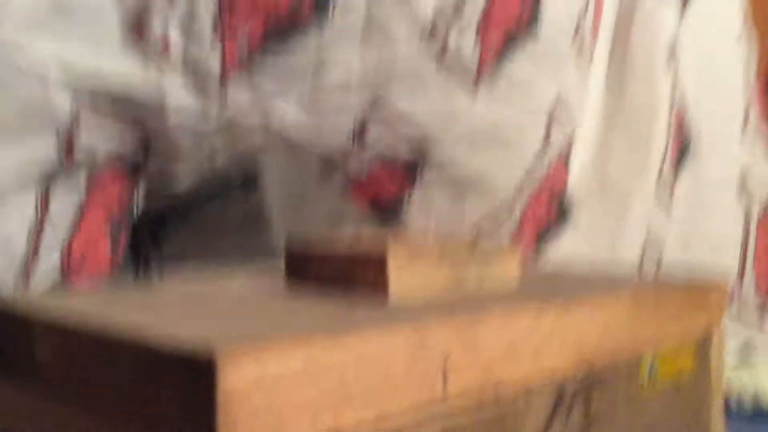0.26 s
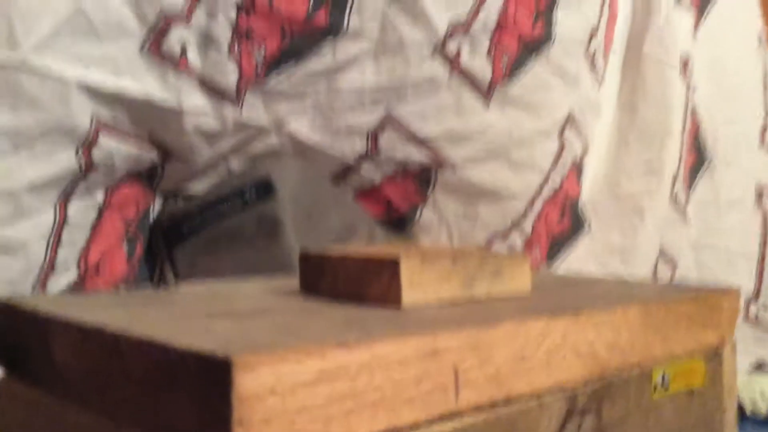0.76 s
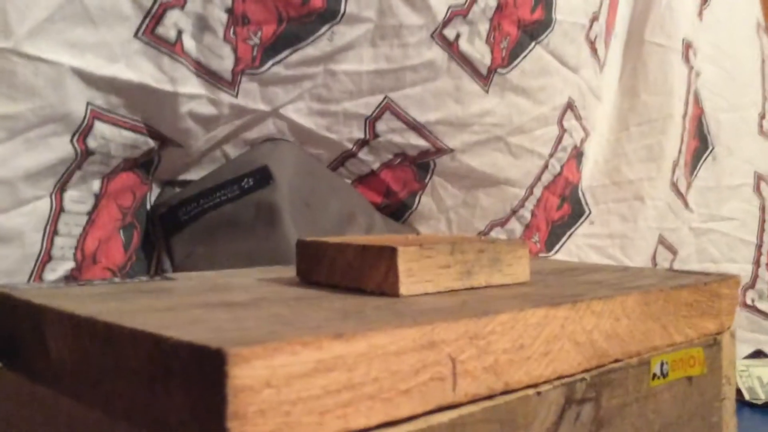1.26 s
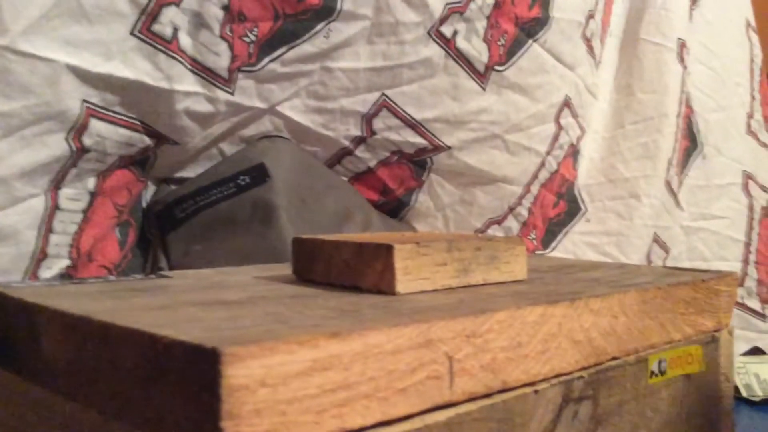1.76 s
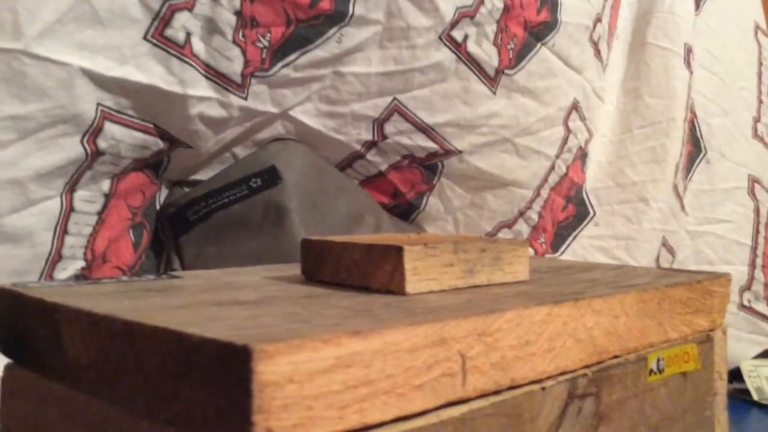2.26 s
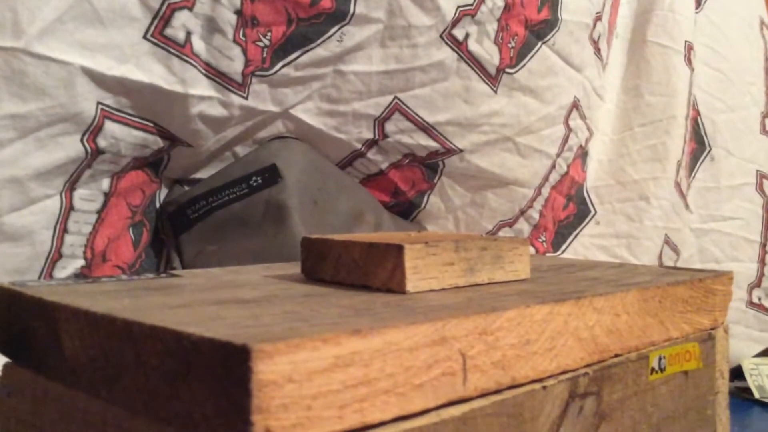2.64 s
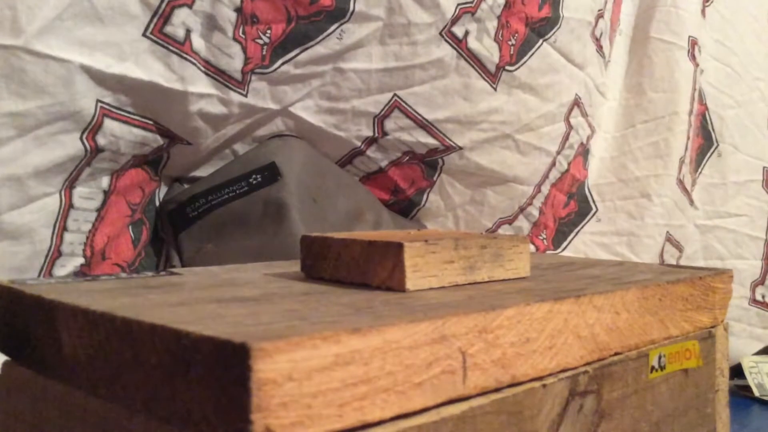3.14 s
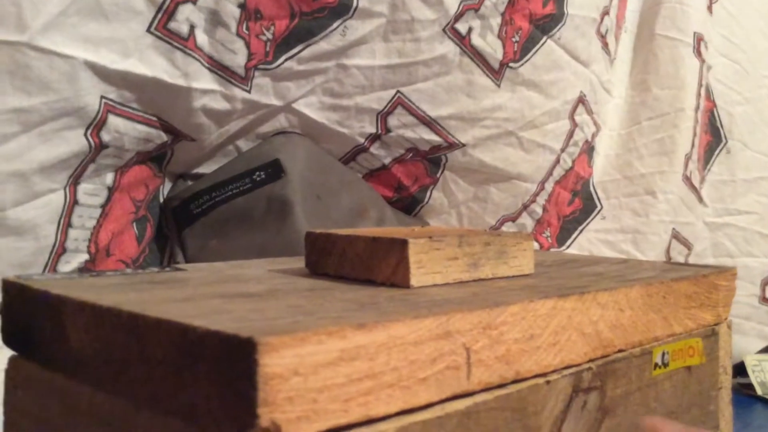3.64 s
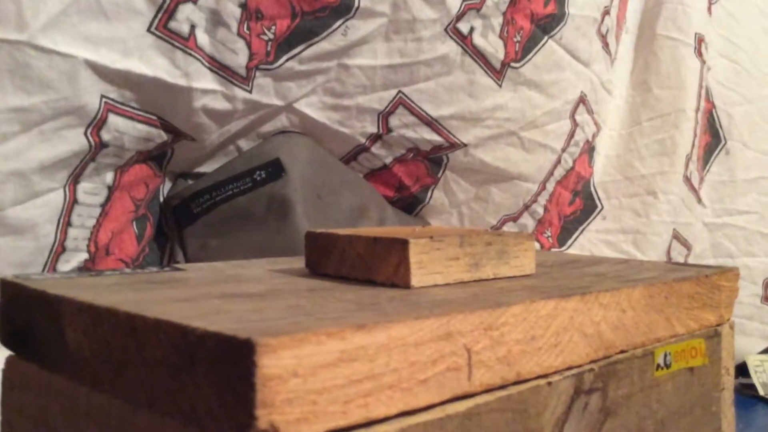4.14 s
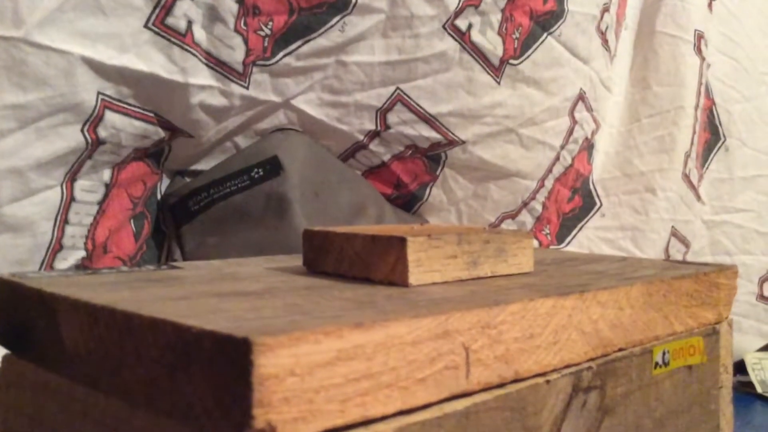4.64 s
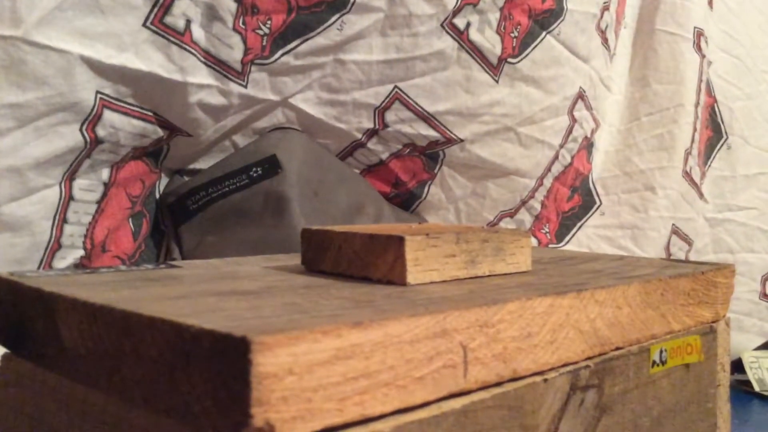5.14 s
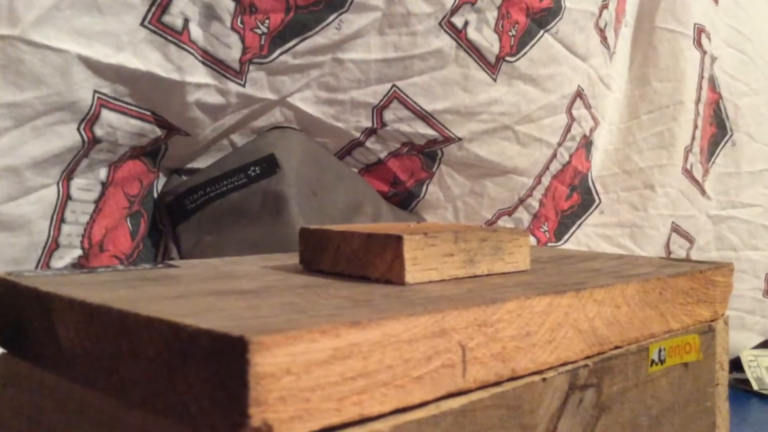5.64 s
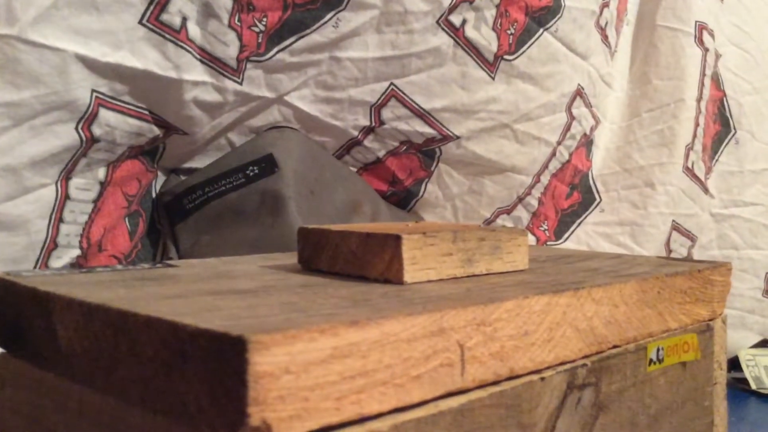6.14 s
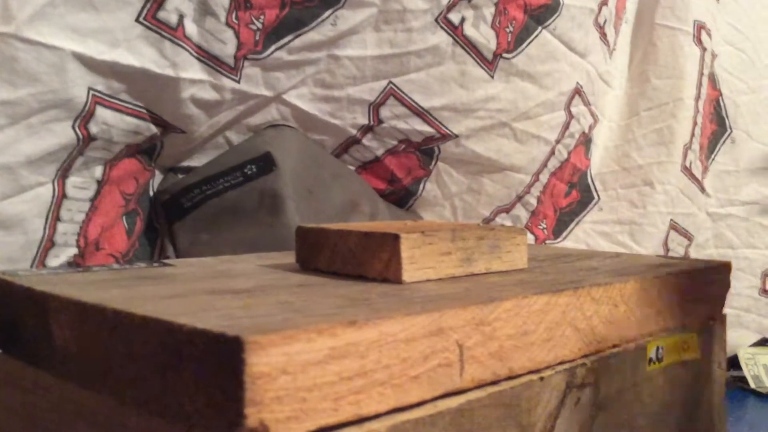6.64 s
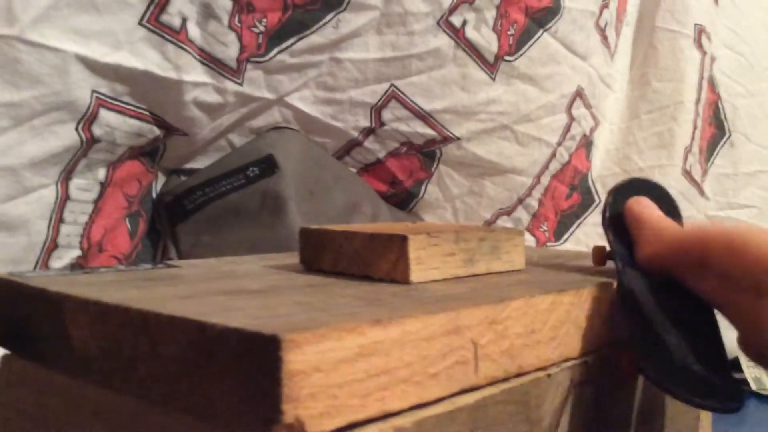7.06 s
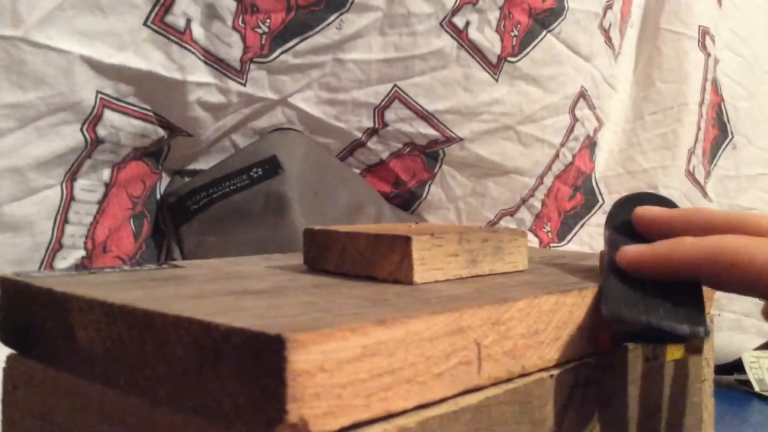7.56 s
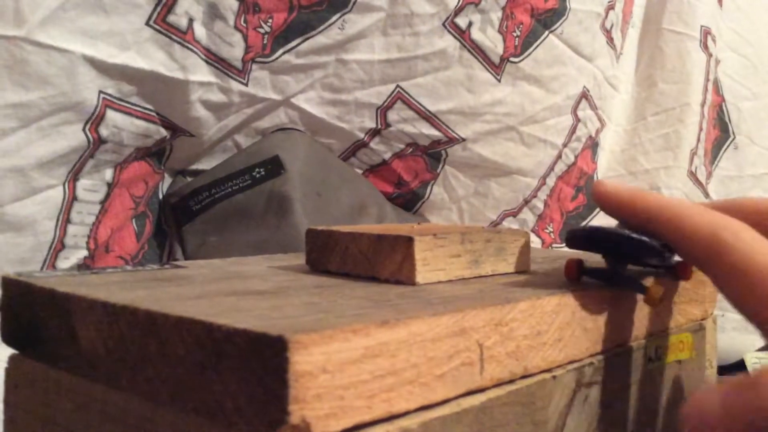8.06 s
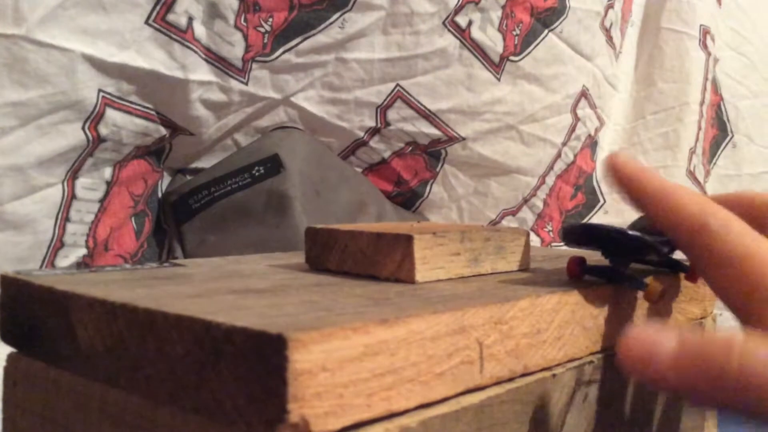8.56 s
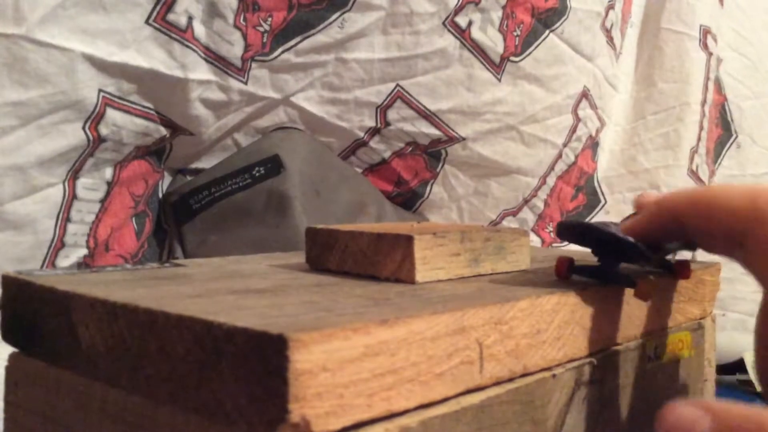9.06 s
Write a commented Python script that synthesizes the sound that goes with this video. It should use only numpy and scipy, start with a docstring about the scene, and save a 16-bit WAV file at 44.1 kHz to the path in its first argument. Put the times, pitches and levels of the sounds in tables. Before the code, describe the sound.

Handling thumps, then a tiny finger skateboard knocks and grinds sharply on wood, its later touches fading to faint taps, with a distant engine climbing.

```python
"""A quiet room hums and cloth rustles throughout; at first a hand rubs and bumps a camera as it is set down,
then a finger-sized skateboard rolls, grinds and clacks on a hollow wooden box, while a far engine climbs in two gears.
Hum and rustle are coloured noise, the engine and the bumps are sine waves, and the rub is noise ringing the camera body.
Each touch of the board shakes its deck, the box, the trucks and the loose axles, and the room answers with an echo."""
import sys
import numpy as np
from scipy import signal
from scipy.fft import rfft, irfft, next_fast_len
from scipy.io import wavfile
from scipy.ndimage import uniform_filter1d, map_coordinates

SR = 44100
rng = np.random.default_rng(int(sys.argv[2]) if len(sys.argv) > 2 else 0)


def int16_out(signal):
    """Quantize to a 16-bit WAV file."""
    q = np.round(np.clip(np.atleast_2d(signal).T, -1, 1) * 32767)
    wavfile.write(sys.argv[1], SR, q.astype(np.int16))


N = 410571  # length in samples

# All levels in the tables are relative: later steps scale or colour them.
# echo of the room: (frequency [Hz], time to fall 60 dB [s])
ROOM_DECAY = [(150, 0.059), (1000, 0.077), (4000, 0.053), (12000, 0.027)]
# tone colour of the room hum: (frequency [Hz], level [dB])
HUM_COLOUR = [(15, -63.5), (25, -28.5), (49, -13), (73, -4.5), (91, -15), (136, -7.5), (173, -14.5),
              (389, -8.5), (648, -18), (895, -26.5), (1800, -35), (2230, -52.5), (7700, -46.5),
              (15500, -51.5)]
# strength of the moving cloth: (time [s], level [dB])
RUSTLE_LEVEL = [(0, -69.5), (.15, -68), (.45, -62), (.7, -69), (1.4, -76), (2.3, -79), (6.9, -74),
                (7.2, -71), (7.4, -67.5), (7.7, -75.5), (8.3, -72), (8.5, -72.5), (8.65, -75), (9.31, -69)]
# tone colour of the cloth: (frequency [Hz], level [dB])
CLOTH_COLOUR = [(590, -30.5), (1000, -10), (3080, -12.5), (4390, -15), (7110, -22), (8160, -15.5),
                (15500, -37.5)]
# the far engine, one list for each gear: (time [s], frequency [Hz], level [dB])
ENGINE_GEARS = [
    [(2.3, 115, -77), (2.9, 122.9, -64), (3.5, 140.2, -58.5), (4.25, 179.8, -75), (4.6, 213, -101)],
    [(5.8, 116.9, -80), (6.2, 123.9, -66), (7.7, 153.7, -68.5), (8.1, 166.8, -75)],
]
# hand rubbing the camera: (time [s], level [dB])
RUB_LEVEL = [(0, -67), (.25, -59), (.5, -55), (.75, -65), (.95, -59), (1.3, -67), (1.6, -67)]
# ringing tones of the camera body: (frequency [Hz], level [dB], time to fall 60 dB [s])
CAMERA_MODES = [(328, -3, 0.0021), (546, 6.5, 0.016), (840, -6.5, 0.012)]
# knocks on the camera body: (time [s], starting level [dB], frequency [Hz], time to fall 60 dB [s])
CAMERA_KNOCKS = [(.408, -29, 130, 0.042), (0.41, -32, 660, 0.032), (.443, -27.5, 620, 0.0059),
                 (0.518, -33.5, 606, 0.011), (.578, -39, 604, 0.023), (0.636, -37.5, 640, 0.014),
                 (0.722, -19, 96, 0.015), (.917, -41, 740, 0.018)]
# ringing tones of the freely ringing deck: (frequency [Hz], level [dB], time to fall 60 dB [s])
DECK_MODES = [(783, -1, .13), (875, -9, .05), (955, -11, .04), (1300, -11, .045), (1480, -21, .2),
              (1655, -4, .085), (1850, -4, .06), (1920, -7, .06), (2060, -4, .06), (2240, -7, .05),
              (2390, -8, .05)]
# ringing tones of the hollow box: (frequency [Hz], level [dB], time to fall 60 dB [s])
BOX_MODES = [(84, -4.5, 0.04), (106, -4, 0.091), (181, 3.5, 0.063), (245.1, 0, 0.041), (380, 5, 0.016),
             (430, 8, 0.013), (574, -3, 0.0027), (676, -3.5, 0.032)]
# ringing tones of the trucks that carry the wheels, when free: (frequency [Hz], level [dB], time to fall 60 dB [s])
TRUCK_MODES = [(2690, -2, .05), (3060, 0, .06), (3410, -2, .06), (3700, -3, .05), (4150, -5, .04),
               (4660, 0, .06), (4900, -5, .1), (5470, -6, .05)]
# broad rattle of the loose axles: (frequency [Hz], level [dB], time to fall 60 dB [s])
AXLE_MODES = [(5560, 3, 0.00061), (8150, 9, 0.0014), (8800, 5, 0.0011), (11600, 0, 0.00054)]
# fingers lift off and the deck rings freely: (start [s], end [s], freedom [0-1])
LIFTS = [(1.74, 1.922, 0.85), (4.07, 4.266, 0.98), (6.575, 6.772, 0.85)]
# single touches: (time [s], deck [dB], box over deck [dB], trucks and axles over deck [dB])
TOUCHES = [(1.049, -34, -28, -17), (1.057, -30, -2.5, 0), (1.562, -29.5, -9, -4), (1.608, -30.5, -9, -18),
           (1.663, -17, -14.5, -11), (1.681, -16, -28, -5), (1.701, -9.5, -8.5, -1),
           (1.704, -13, -21.5, -8), (1.737, -9, -0.5, -18.5), (1.749, -10.5, -12.5, -7.5),
           (1.756, -3.5, -16, -14.5), (1.807, -9.5, -37, -12.5), (1.841, -11, -15.5, -19),
           (1.927, -45, -5.5, 13), (1.96, -7.5, -26.5, -21.5), (1.982, -17, -12, -10),
           (1.989, -33.5, -13, 10), (2.009, -16.5, -16, -7), (2.019, -43.5, -8.5, 18),
           (2.03, -6.5, -4, 5.5), (2.037, -15.5, -14, -25.5), (2.042, -13, -8, 6), (2.053, -31, 11, -12.5),
           (2.072, -21, 6.5, -1.5), (2.102, -1, -13, -18), (2.126, -12.5, -10, 0), (2.133, -13, -6, -23),
           (2.136, -10.5, -6, -3), (2.172, -42, 12, -12), (2.267, -33.5, -28, -22),
           (3.611, -39, -35.5, -29), (3.684, -23.5, 1, -9), (3.702, -18.5, -18, -8),
           (3.713, -19.5, -9.5, -7), (3.8, -21, -0.5, -25), (3.826, -30, -18, -3.5),
           (3.843, -17.5, -24, -13), (3.846, -20, -7, 6.5), (3.859, -29.5, -18, 6.5), (4.066, -54, -24, 14),
           (4.094, 0.5, -25, -12), (4.111, -6.5, -39.5, -46.5), (4.342, -32.5, 6, 15),
           (4.351, -10, -3, 12.5), (4.374, -19, -6.5, -18), (4.444, -25, -1, 10), (4.451, -21, -9, 13),
           (4.462, -21, -8.5, 3), (4.534, -33, -6, 4), (4.827, -34, 2.5, -3.5), (5.136, -23, -19, -19),
           (5.188, -22.5, -30, -2), (5.2, -19, -24, -4), (5.225, -22, -4.5, -5), (5.454, -42, 13, -20),
           (5.494, -42, 9, -23.5), (5.526, -53, -20, 23.5), (5.539, -24, -7, 8.5), (5.605, -31.5, -5, 10.5),
           (5.611, -30, -2, 11.5), (5.806, -32, -8.5, 2), (5.971, -59.5, -19.5, 16), (5.986, -64, -7, 18),
           (6.041, -42, 2, -1), (6.052, -31, -38, -0.5), (6.141, -36, -22, -11.5), (6.287, -45, -20, -24),
           (6.338, -33.5, -2, -8), (6.361, -29, -17.5, 3), (6.423, -30.5, -14.5, 10), (6.425, -25, -10, -7),
           (6.523, -17.5, -26, 7.5), (6.544, -6, -27.5, 0.5), (6.56, -2.5, -20.5, -32),
           (6.579, -5.5, -9.5, -8.5), (6.623, -7.5, -12, -13.5), (6.787, -33, 10, 4.5), (6.807, -25, 13, 2),
           (6.812, -18.5, 6.5, -5.5), (7.018, -49.5, 10, -0.5), (7.031, -41, -17, -3),
           (7.076, -50.5, 7.5, -4.5), (7.088, -42.5, 4, -6), (7.443, -48, 9.5, 3.5), (7.51, -53, -11, -12),
           (7.559, -36, -1, -21), (7.569, -36, -2.5, -9.5), (7.856, -60, 18, -15), (7.905, -57, 16, -4),
           (8.001, -47, 13, -16), (8.016, -44.5, -17, 3), (8.02, -32.5, 7, -23), (8.072, -42, 6, -15.5),
           (8.238, -34, -1, -11.5), (8.664, -36.5, -7, -17.5), (8.702, -44, 22.5, -31.5),
           (8.71, -53.5, 21, -3.5), (8.743, -62, -22, 4), (8.761, -37, -17, -5), (8.775, -20, -3, -12.5),
           (8.806, -35, 11, -13.5), (9.003, -74.5, -5, 5), (9.074, -65, 6.5, -5), (9.09, -52.5, 16, -22),
           (9.129, -46.5, 13, -32), (9.166, -53.5, 18, -16.5), (9.239, -70.5, 5, 3), (9.264, -37, 10, -5),
           (9.275, -36, 3.5, -17)]
# how a touch drives each body: (deck [dB], box [dB], trucks [dB], axles [dB])
BLOW_LEVELS = [0.5, -2.5, 4, 5]
# wheels rolling and the deck grinding:
# (start [s], rise [s], hold [s], fade [s], deck [dB], box over deck [dB], trucks and axles over deck [dB])
ROLLS = [(1.54, 0.076, 0.079, 0.014, -39.5, 5, -18.5), (1.69, 0.014, 0.12, 0.11, -22.5, -7, -9.5),
         (3.58, 0.039, 0.2, 0.037, -40, 3, -13.5), (4.82, 0.079, 0.032, 0.045, -32.5, -0.5, -5),
         (4.935, 0.012, 0.027, 0.037, -32.5, -14, -8), (5.09, 0.042, 0.018, 0.11, -33.5, -9, -35),
         (5.16, 0.02, 0.045, 0.092, -36.5, -0.5, -11), (5.33, 0.024, 0.12, 0.16, -42, -3, -2.5),
         (5.72, 0.034, 0.0067, 0.12, -44, 1, 2), (6.32, 0.2, 0.04, .05, -31, 0, -20),
         (6.49, 0.067, 0.082, 0.1, -19, -10.5, -9.5), (7.43, 0.0069, 0.069, 0.034, -62, 4, -3.5),
         (7.84, 0.018, 0.057, 0.32, -71, 18.5, -7), (8.75, 0.023, 0.005, 0.082, -41.5, 12, -11.5)]
# the board skitters on between and after touches:
# (start [s], rise [s], hold [s], fade [s], deck [dB], box over deck [dB], trucks and axles over deck [dB])
SKITTERS = [(1.96, 0.0069, 0.19, 0.17, -43.5, 0, -6), (3.84, 0.01, 0.075, 0.23, -62, -8, 2.5),
            (4.066, 0.0092, 0.015, 0.0095, -59.5, 9, 12), (4.1, 0.019, 0.011, 0.26, -44, -9, 5),
            (4.36, 0.0076, 0.13, 0.14, -52.5, 6, 7), (4.97, 0.0072, 0.034, 0.13, -44, 3, -9),
            (5.53, 0.082, 0.008, 0.19, -47.5, 1, 3), (5.87, 0.014, 0.42, 0.065, -64, 7.5, -30),
            (6.785, 0.014, 0.035, 0.061, -48.5, 16, -1), (6.82, 0.008, 0.024, 0.65, -69, 18.5, -3.5),
            (7.56, 0.016, 0.055, 0.021, -72.5, 16, -2.5), (8.0, 0.0097, 0.05, 0.074, -63.5, 2, -5),
            (8.66, 0.038, 0.1, 0.23, -64, 18.5, -10.5), (8.92, 0.0064, 0.91, 0.13, -70.5, 11.5, -33)]
# power on the rise and fade; the trucks wake latest and hush soonest: (deck [1], box [1], trucks [1], axles [1])
SWELL_POWERS = [1.05, 1.1, 2.1, 1.1]
# the grip, the place on the box and the distance set what speaks up: (time [s], second deck modes [dB],
# middle deck modes [dB], upper deck modes [dB], lower box modes [dB], upper truck modes [dB], axles [dB])
COLOUR_OVER_TIME = [(1, -8, -5.5, -8.5, -8, -8.5, -16.5), (1.66, -9, -10, -12.5, -15.5, 0, -10.5),
                    (1.7, -10, -9.5, 0.5, -6, -3, -5.5), (1.76, -6.5, -4.5, -2.5, 4.5, -3.5, 0),
                    (1.86, -11, -5, -8.5, -1.5, -0.5, 0.5), (1.96, -1, -17.5, 6, -7.5, -3.5, 12.5),
                    (2.01, -0.5, -14, -10.5, 0, 0, 1), (2.035, -9, -3.5, 3.5, -5.5, -13.5, -5),
                    (2.1, -5.5, -17.5, -5, -7, -4, 6), (2.135, -0.5, 2, -10, -0.5, -10, -1),
                    (3.6, -0.5, -2.5, -25, -13, -7, -8.5), (3.85, -6, -7.5, -5, 3, -1, 6.5),
                    (4.095, -19.5, -13.5, -2.5, 1, -6, -9.5), (4.35, -9, -9, -12.5, -19.5, -11.5, -12.5),
                    (4.54, -12.5, -3, 7, -6.5, -2, -8), (4.85, -5.5, -2, -17, -12, -9, -23),
                    (4.95, -5, -3, -16, -27, -6, -6.5), (5.13, -6, -8.5, -36, -12, -8, -18),
                    (5.2, -6, -2, -6, -11.5, -1.5, -17), (5.5, -3, -1.5, -18, -2.5, -6.5, -14),
                    (6.4, 0.5, 0, -16.5, -10, -1.5, -22.5), (6.52, -6, 0, -8, -8, 1, -2),
                    (6.6, -9, -4, -7, 7, -4, -1), (6.8, -4.5, -2.5, -3.5, -12, -3, 12),
                    (7, -12.5, 0.5, 6, 1, -6.5, 12), (7.5, 2, -5.5, -11, -0.5, 2, 2),
                    (8, 5.5, 7, -14, -0.5, -5, 13), (8.24, -1.5, -13, -19.5, -5, -3.5, 0),
                    (8.77, -12, 3, -19, -6.5, -9, 14.5), (9.2, 4.5, 0, -17, -13, -17, 13.5)]

HUM_DB = -59
RISE_POWER, FADE_DB = 2.2, 30  # a roll falls this many dB in one fade time, before the swell power
HELD_FREEDOM, TRUCK_FREEDOM = 0.0046, 0.4  # deck while held [0-1]; trucks as a share of the deck's freedom
HELD_DAMPING, PRESSED_DAMPING, TRUCK_DAMPING = 10, 24, 9  # times faster dying than when free
HELD_LOWEST_DB = -6.5  # fingers rest where the lowest deck mode swings most
LOWER_DECK_DB, UPPER_BOX_DB, LOWER_TRUCKS_DB, DEEP_BOX_DB = -3.5, -2.5, -3.5, -6.5
TOP_GROWS, TOP_RATTLE_DB = 1.6, -21.5  # the highest rattle swings wider than the rest
LIGHT_FROM_DB, SCUFF_PER_DB = -29, 0.0681  # lighter touches are scuffs: longer chatter, weaker push
LEAD_S, CHATTER_RISE_S = 0.0012, 0.0018  # chatter starts a moment before the push
SPOT_ECHO, SPOT_SAMPLES = 0.72, 18  # near echo: gain before a random factor, longest delay
TOP_HZ, TOP_ORDER = 15500, 70


def amp(db):
    """Turn decibels into a gain."""
    return 10 ** (np.asarray(db) / 20)


def unit(x):
    """Scale a sound to an average strength (rms) of 1."""
    return x / np.sqrt(np.mean(x ** 2) + 1e-20)


def along(points, hz):
    """Read a curve of (frequency, value) points on a log frequency axis."""
    f, v = np.transpose(points)
    return np.interp(np.log(hz + 1), np.log(f + 1), v)


def curves(rows, outside=None):
    """Draw each column after the time as a curve with one value per sample."""
    s, *cols = np.transpose(rows)
    return np.array([np.interp(np.arange(N) / SR, s, c, outside, outside) for c in cols])


def wobble(rate):
    """A smooth random curve with this many knots a second."""
    knots = rng.standard_normal(int(N * rate / SR) + 4)
    return map_coordinates(knots, [np.arange(N) * rate / SR])


def filtered(x, response):
    """Weigh every frequency of a sound by a response curve."""
    m = next_fast_len(N + SR // 2)
    return irfft(rfft(x, m) * response(np.fft.rfftfreq(m, 1 / SR)), m)[..., :N]


def noise(spectrum):
    """Hiss with a given tone colour, at rms 1."""
    return unit(filtered(rng.standard_normal(N), lambda hz: amp(along(spectrum, hz))))


def ringing(force, modes, damping=1):
    """A shaken body rings at its own tones and answers little far outside them; overall gain is 1 for white noise."""
    def response(f):
        h = 0
        for k, (centre, db, t60) in enumerate(modes):
            width = 2.2 / t60  # a tone that dies faster is broader
            h = h + (-1) ** k * amp(db) * 1j * f * width / (centre ** 2 - f * f + 1j * f * damping * width)
        h = h / (1 + 1j * f / (1.7 * modes[-1][0])) ** 2  # dull above the highest tone
        h = h * f / (f - .45j * modes[0][0])  # thin below the lowest tone
        return h / np.sqrt(np.mean(abs(h) ** 2))
    return filtered(force, response)


def room_echo(x):
    """Walls return a sound as a noisy tail in which each frequency dies at its own speed."""
    hz, t, z = signal.stft(rng.standard_normal(SR // 2), SR, nperseg=256)
    dying = z * amp(-60 * t / along(ROOM_DECAY, hz)[:, None])
    tail = signal.istft(dying, SR, nperseg=256)[1]
    late = np.pad(x, (200, 0))  # the echo comes 200 samples late
    return signal.fftconvolve(late, tail / np.linalg.norm(tail))[:N]


def room_hum():
    """Coloured noise whose level breathes a little."""
    return amp(HUM_DB + .8 * wobble(5) + .8 * wobble(12)) * noise(HUM_COLOUR)


def cloth_rustle():
    """Moving cloth is coloured noise with a soft, uneven crackle."""
    crackle = amp(1.5 * wobble(10) + 2 * wobble(70))
    return amp(curves(RUSTLE_LEVEL)[0]) * crackle * noise(CLOTH_COLOUR)


def engine():
    """A wavering firing tone with a softer tone at three times its frequency."""
    out = np.zeros(N)
    for rows in ENGINE_GEARS:
        hz, db = curves(rows, outside=-200)  # -200 dB keeps it silent outside its time
        turn = 2 * np.pi * np.cumsum(hz * (1 + 0.0047 * wobble(2.5))) / SR
        out += amp(db + 3.5 * wobble(9)) * (np.sin(turn) + amp(-13) * np.sin(3 * turn))
    return out


def camera_rub():
    """A hand rubbing the camera is uneven noise that makes its body ring."""
    level = amp(curves(RUB_LEVEL, outside=-200)[0] + 4 * wobble(50))
    return ringing(level * rng.standard_normal(N), CAMERA_MODES)


def camera_knocks():
    """Each knock on the camera is a sine wave that dies away quickly."""
    out, t = np.zeros(N), np.arange(3000) / SR
    for s, db, hz, t60 in CAMERA_KNOCKS:
        out[round(s * SR):][:len(t)] += amp(db - 60 * t / t60) * np.sin(2 * np.pi * hz * t)
    return out


def bodies(deck_db, box_over_db, trucks_over_db):
    """Levels of deck, box, trucks and axles for one touch."""
    return deck_db + np.array([0, box_over_db, trucks_over_db, trucks_over_db])


def freedom():
    """How freely the deck rings, 0-1: lifted fingers let it sing, with softened changes."""
    t = np.arange(N) / SR
    free = np.full(N, HELD_FREEDOM)
    for start, end, share in LIFTS:
        free += (share - HELD_FREEDOM) * ((t > start) & (t < end))
    return np.clip(uniform_filter1d(free, size=400), 0, 1)


def friction(rows, bump_rate, uneven_db, uneven_rate, bumpy):
    """Wheels and deck rub over wood grain: fine grit plus random bumps of uneven size push the four bodies."""
    level = np.zeros((4, N))
    for s, rise, hold, fade, *db in rows:
        start = round(s * SR)
        t = np.arange(min(round((rise + hold + 2 * fade) * SR), N - start)) / SR
        swell = np.clip(t / rise, 0, 1) ** RISE_POWER
        swell = swell * amp(-FADE_DB * np.clip((t - rise - hold) / fade, 0, None))
        level[:, start:][:, :len(t)] += amp(bodies(*db))[:, None] * swell ** np.c_[SWELL_POWERS]
    chance, size = rng.random((2, N))
    bumps = unit((chance < bump_rate / SR) * amp(-3.5 * np.log(size + .03)))
    grit = unit(rng.standard_normal((4, N)) * amp(uneven_db * wobble(uneven_rate)))
    shares = [0.69, 0.36, 0.1, 0.16]  # bumps reaching deck, box, trucks, axles
    return level * [unit(bumpy * share * bumps + g) for share, g in zip(shares, grit)]


def contacts():
    """Each touch is a short push and ragged chatter on the four bodies, the chatter longer when the board is let go."""
    size = 2600
    force, t, free = np.zeros((4, N + size)), np.arange(size) / SR, freedom()
    # rows below: deck, box, trucks, axles
    short = np.array([[.006], [.005], [.009], [.011]])  # chatter time to fall 60 dB [s], before stretching
    stretch = np.c_[[3, 6, 6, 6]]
    push = np.exp(-t / [[.0001], [.0004], [.00004], [.00003]])
    for s, *db in TOUCHES:
        scuff = 1 + SCUFF_PER_DB * max(LIGHT_FROM_DB - db[0], 0)
        lasting = scuff * short * (1 + stretch * free[round(s * SR)])
        fade = amp(-60 * t / lasting) * -np.expm1(-t / CHATTER_RISE_S)
        ragged = amp(4 * np.repeat(rng.standard_normal(size // 26), 26))
        chatter = fade * ragged * rng.standard_normal((4, size))
        # chance leaves the chatter's energy unchanged
        chatter *= (np.linalg.norm(fade, axis=1) / np.linalg.norm(chatter, axis=1))[:, None]
        late_push = np.roll(push / scuff, round(LEAD_S * SR), axis=1)
        blow = late_push * [[1.05], [.9], [.35], [.22]] + chatter * [[.35], [.3], [.7], [.75]]
        # each blow lands on another spot, so a random near echo colours it
        echo_gain = SPOT_ECHO * rng.uniform(-1.4, 1)
        blow = blow + echo_gain * np.roll(blow, round(SPOT_SAMPLES * rng.uniform(0.36, 1)), axis=1)
        force[:, round((s - LEAD_S) * SR):][:, :size] += amp(bodies(*db) + BLOW_LEVELS)[:, None] * blow
    return force[:, :N]


def board():
    """Touches and rolling ring deck, box, trucks and axles; fingers damp the deck, most while it rolls."""
    rolling = friction(ROLLS, 400, 4, 140, 1.3) + friction(SKITTERS, 90, 4, 70, .8)
    blows = contacts()
    deck, box, trucks, axles = blows + rolling
    second, middle, upper, low_box, high_trucks, rattle = amp(curves(COLOUR_OVER_TIME))
    free = freedom()

    out = ringing(blows[1] * low_box * amp(DEEP_BOX_DB), BOX_MODES[:2])  # only blows reach the deepest tones
    out += ringing(box * low_box, BOX_MODES[2:3])
    out += ringing(box * amp(UPPER_BOX_DB), BOX_MODES[3:])

    out += ringing(axles * rattle, AXLE_MODES[:3])
    out += ringing(axles * rattle ** TOP_GROWS * amp(TOP_RATTLE_DB), AXLE_MODES[3:])

    deck_groups = [(amp(LOWER_DECK_DB), amp(HELD_LOWEST_DB), DECK_MODES[:1]), (second, 1, DECK_MODES[1:3]),
                   (middle, 1, DECK_MODES[3:6]), (upper, 1, DECK_MODES[6:])]
    for share, held_gain, modes in deck_groups:
        held = share * np.sqrt(1 - free) * held_gain
        out += ringing(deck * share * np.sqrt(free), modes)
        out += ringing(blows[0] * held, modes, HELD_DAMPING)
        out += ringing(rolling[0] * held, modes, PRESSED_DAMPING)

    truck_free = TRUCK_FREEDOM * free
    for share, modes in [(amp(LOWER_TRUCKS_DB), TRUCK_MODES[:4]), (high_trucks, TRUCK_MODES[4:])]:
        out += ringing(trucks * share * np.sqrt(truck_free), modes)
        out += ringing(trucks * share * np.sqrt(1 - truck_free), modes, TRUCK_DAMPING)
    return out


def scene():
    """Add up the background, the camera, the board and its echo."""
    background = room_hum() + cloth_rustle() + engine()
    camera = camera_rub() + camera_knocks()
    near = board()
    return (background + camera + near + amp(-12.0) * room_echo(near))[None]


def record(dry):
    """The deepest bass is thinned, loud peaks are rounded off and nothing sounds above about 16 kHz."""
    thin = filtered(dry, lambda hz: (1j * hz / (45 + 1j * hz)) ** 2)
    soft = thin / (1 + np.abs(thin / .88) ** 6) ** (1 / 6)
    return filtered(soft, lambda hz: 1 / (1 + (hz / TOP_HZ) ** TOP_ORDER) ** 2)


dry = scene()
out = record(dry)
int16_out(out)
```